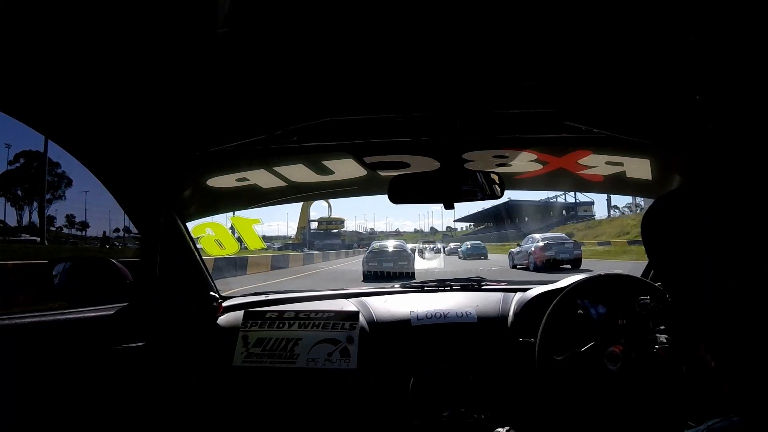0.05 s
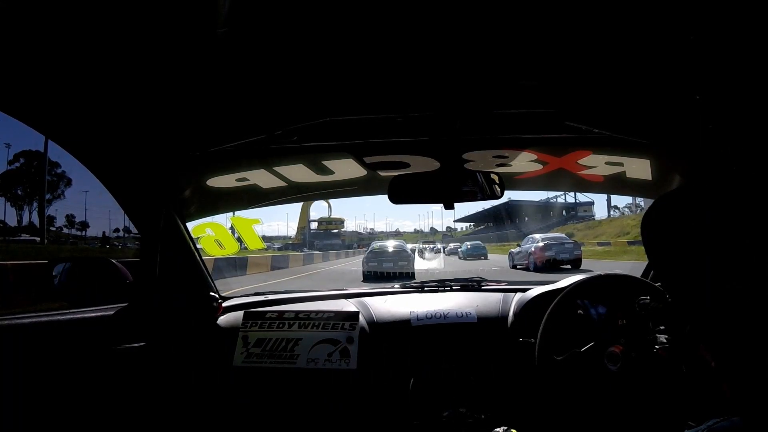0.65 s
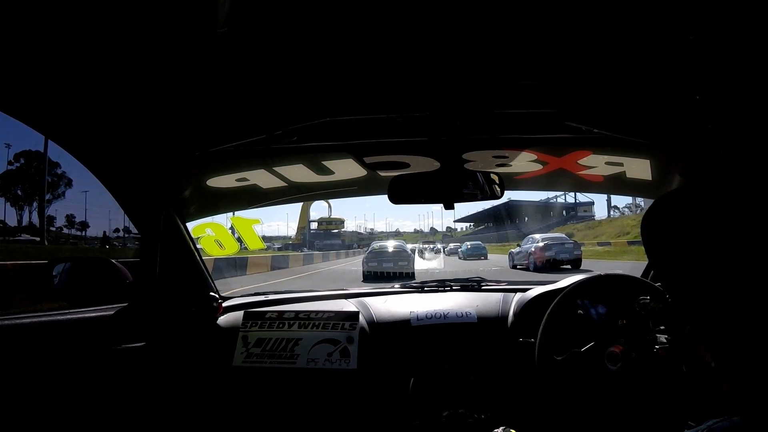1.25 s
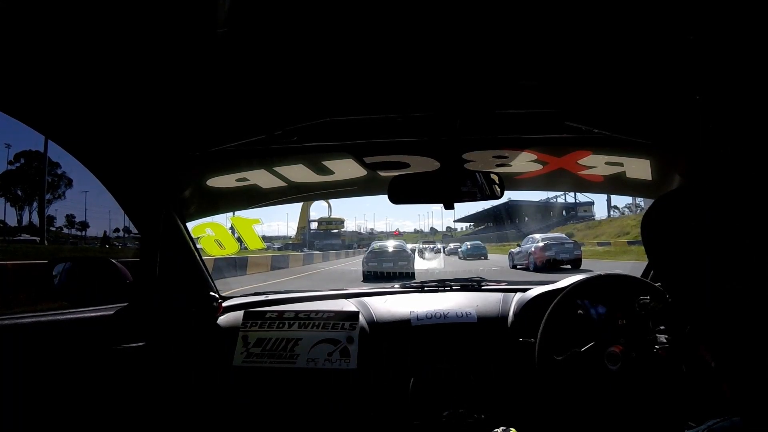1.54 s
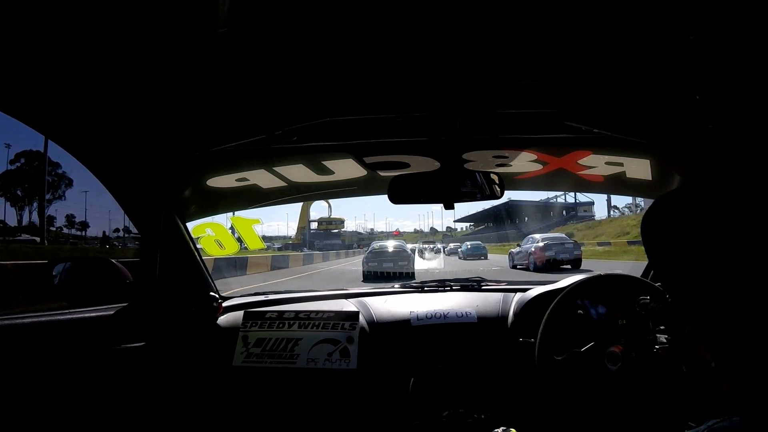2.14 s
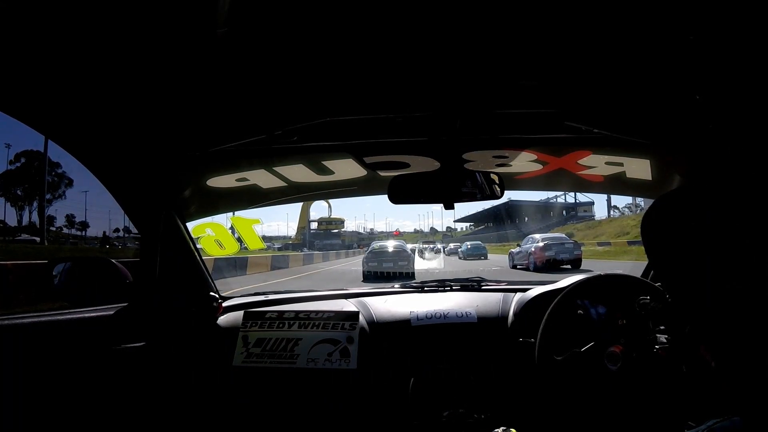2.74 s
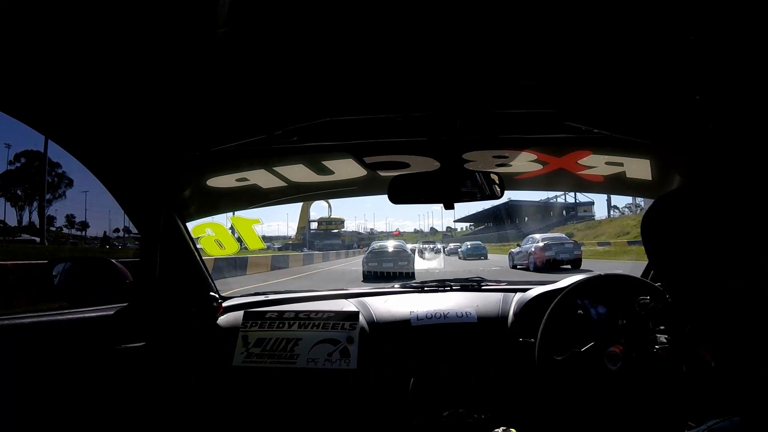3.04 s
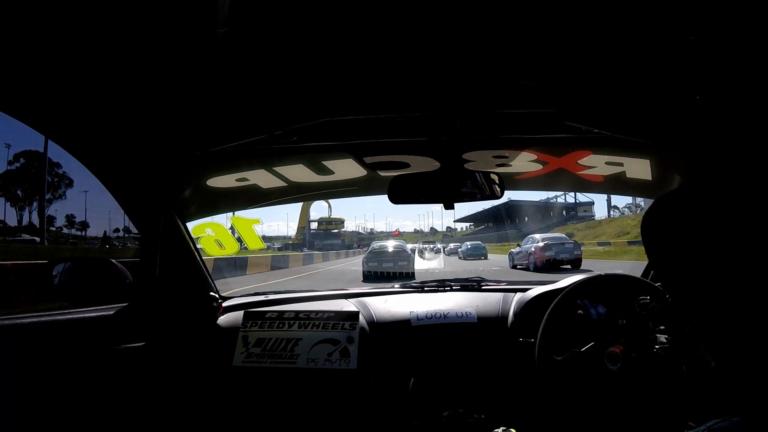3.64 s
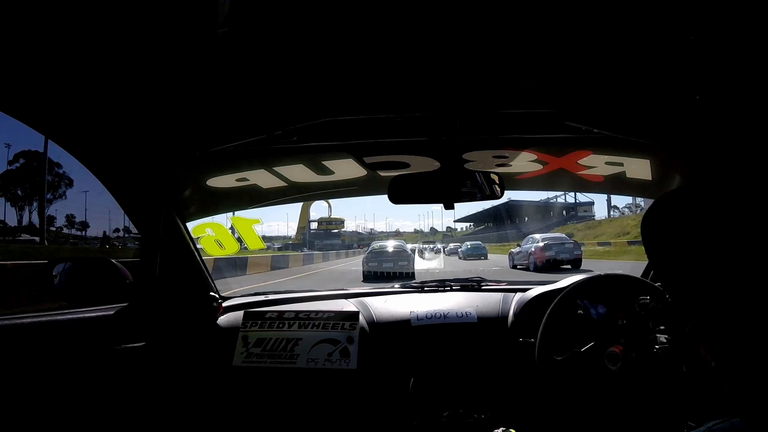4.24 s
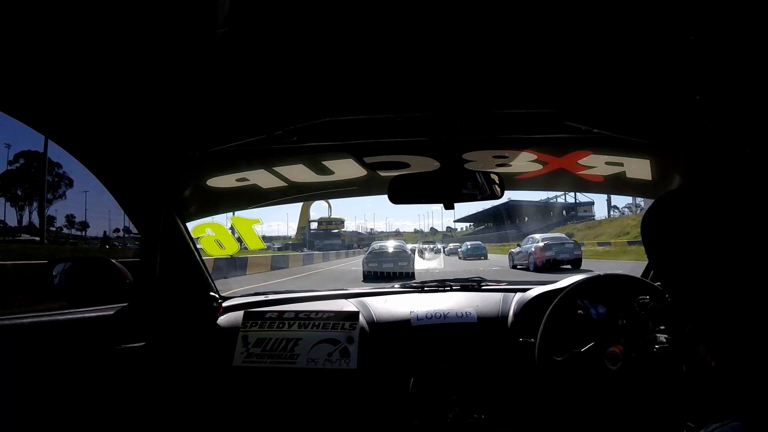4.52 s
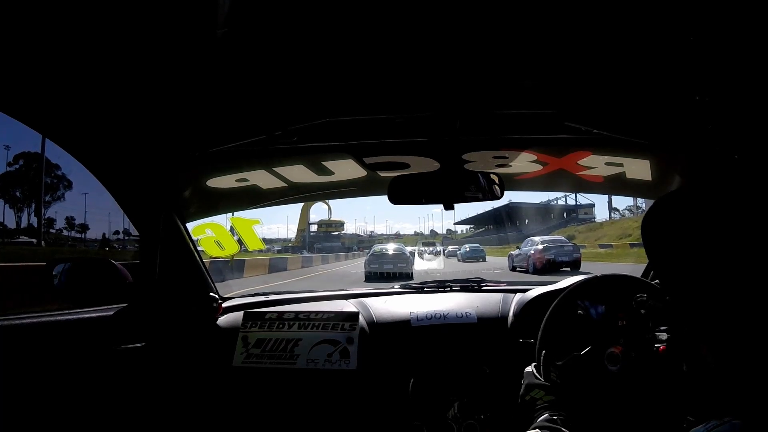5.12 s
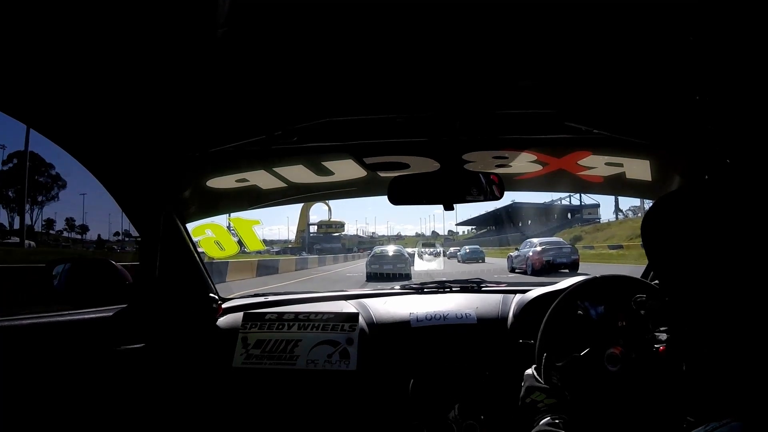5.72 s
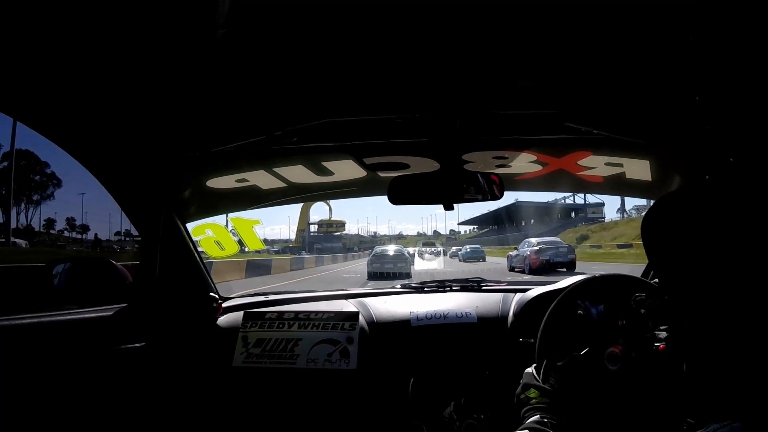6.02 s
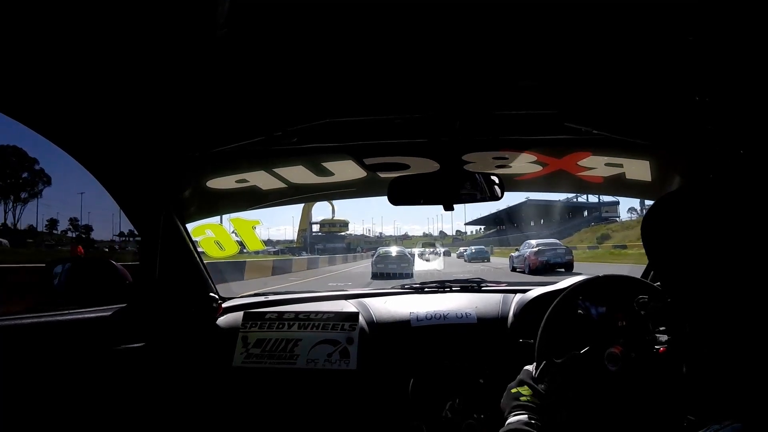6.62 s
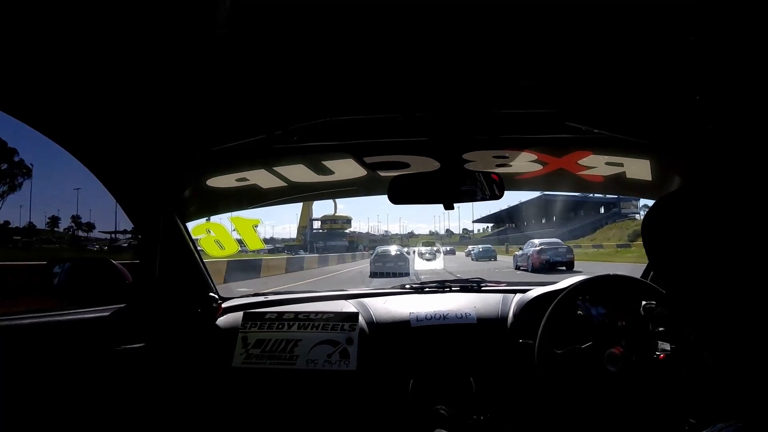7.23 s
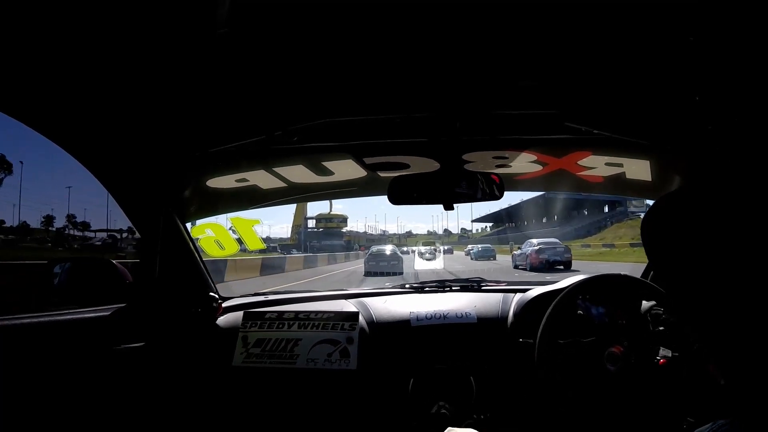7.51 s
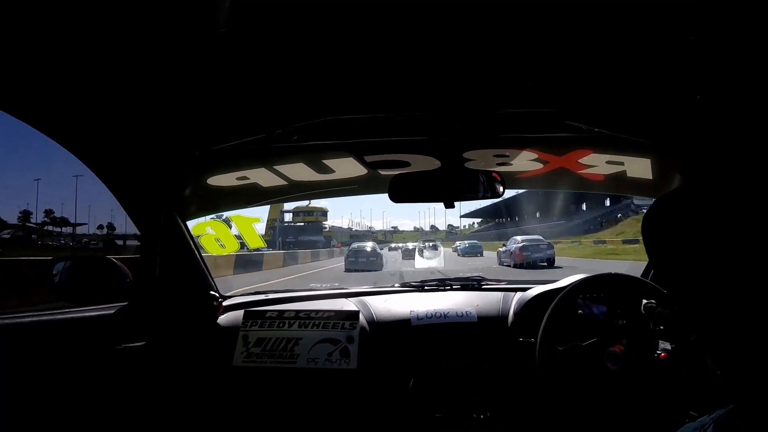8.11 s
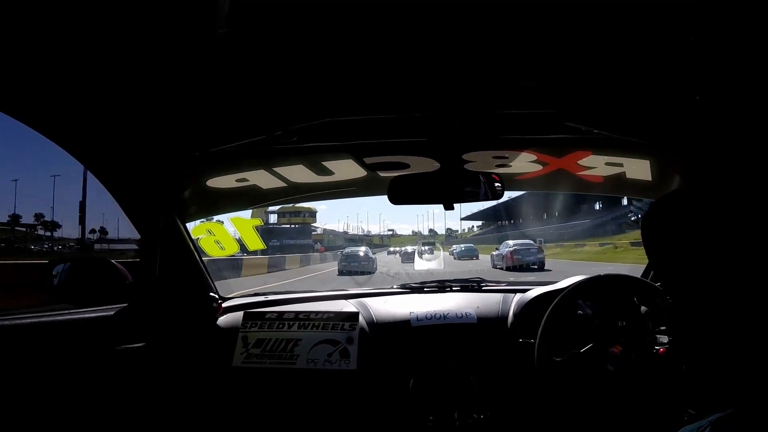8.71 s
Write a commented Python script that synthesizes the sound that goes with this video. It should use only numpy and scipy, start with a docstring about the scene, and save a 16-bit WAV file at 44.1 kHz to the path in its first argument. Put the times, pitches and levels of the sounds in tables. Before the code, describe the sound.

A race car's standing start heard from the cabin: throttle blips, held revs, then hard acceleration with chirping tyres and one upshift.

```python
"""A rotary race engine, heard from inside the car during a standing start, on the left channel.
The driver taps the throttle, launches, pulls through first gear and changes up. Each firing sends out
a pulse of gas; the pulses make a stack of tones that swell as the pipes and cabin ring along.
Spinning tyres stick and slip, grit rattles on the floor, loose trim buzzes and the shell rumbles.
Rival cars hold and raise their revs outside, heard through the bodywork."""
import sys
import numpy as np
from scipy import signal
from scipy.fft import rfft, irfft, next_fast_len
from scipy.io import wavfile
from scipy.ndimage import uniform_filter1d

SR = 44100
rng = np.random.default_rng(int(sys.argv[2]) if len(sys.argv) > 2 else 0)


def log_audio(samples):
    """Write samples as a 16-bit WAV file to the path given in sys.argv[1]."""
    # one column per channel
    frames = np.atleast_2d(samples).T
    # limit to full scale, then quantise
    limited = np.clip(frames, -1, 1)
    pcm = np.round(limited * 32767).astype(np.int16)
    wavfile.write(sys.argv[1], SR, pcm)


N = 395136
TIME = np.arange(N) / SR

# An "order" is a tone at a multiple of the firing rate. "Load" is how hard the engine works.
# The engine's low tones: (order, level [dB], roughness [0-1], slow swelling [dB], lowest load [dB])
LOW_ORDERS = [(1, -29.5, 0.14, 0.5, -19), (2, -40.5, 0.2, 1.53, -8.5), (3, -46.5, 0.07, 1, -11.5),
              (4, -49.5, .35, 2, -25)]
# In-between tones from unequal rotors: (order, level [dB])
ROTOR_ORDERS = [(.5, -2.5), (1.5, -10), (2.5, -7.5), (3.5, -10), (4.5, -17)]
# Speeds at which the pipes boost or weaken a tone: (order, firing rate [Hz], width [Hz], boost [dB])
PIPE_RESONANCES = [(.5, 186, 26, 4.5), (.5, 270, 16, 5.5), (1.5, 238, 14, 8), (1.5, 245, 6, 5),
                   (2.5, 236, 14, -9), (2.5, 290, 10, -7), (2.5, 275, 9, 6.5), (1, 114.3, 31, 12),
                   (1, 160, 12, 1.5), (1, 199, 11, 2.5), (1, 218.2, 22.2, 9), (1, 242.5, 3.5, -11),
                   (1, 249, 13, 11), (1, 269, 9.8, 5), (2, 53.6, 11.2, 12.5), (2, 112, 35, 12),
                   (2, 136, 8.3, -7), (2, 145, 11, 11.5), (2, 160, 11, -5), (2, 181, 16, -5),
                   (2, 197.3, 14, 11.5), (2, 201, 3.5, -9), (2, 208, 9.5, 4.5), (2, 216.5, 3.6, -7.5),
                   (2, 260, 4.6, -7.5), (2, 240, 8.8, 3.5), (2, 253, 9.1, 12), (2, 277, 8.3, 9),
                   (3, 96, 14, 8.5), (3, 177, 6, 2.5), (3, 183.5, 5, 3), (3, 185.5, 22.7, 18),
                   (3, 197.5, 5.5, -10.5), (3, 211, 8, 9), (3, 217.5, 2.8, -8.5), (3, 224, 4.3, 6),
                   (3, 235.7, 11, -13), (3, 241.3, 2, 5.5), (3, 243.5, 7.6, 14.5), (3, 270, 5.2, -2.5),
                   (3, 273, 18, 12), (3, 280, 3.7, -17), (4, 125, 51, 5), (4, 142.8, 16, 10),
                   (4, 181, 8.2, 3), (4, 198, 5.5, 8), (4, 207, 7, 7.5), (4, 234, 7, 7.5),
                   (4, 230, 30, -9.5), (4, 262, 24, 14.5), (4, 277, 8, 3.5), (5, 115, 11, 9),
                   (5, 230, 24, -5.5), (5, 248, 7, 6), (5, 266, 10, -7), (5, 278, 9, 9.5), (6, 187, 10, 5)]
# Uneven burning at idle, clutch bite, wheel hop and lift-off: (start [s], end [s], speed wobble [share])
RAGGED_SPELLS = [(-.1, 2.47, .004), (4.42, 4.95, .014), (5.951, 7.2, .003), (8.05, 8.62, .012)]
# Throttle taps while waiting: (peak time [s], peak firing rate [Hz], load [dB])
THROTTLE_TAPS = [(.08, 51.2, 2.5), (.5, 57.5, 0.5), (1.2, 50, -6), (1.8, 57, 1)]
# Engine speed through rev-up, launch and gear change: (time [s], firing rate [Hz])
ENGINE_REVS = [(2.92, 40.2), (2.98, 71), (3.08, 81), (3.22, 106), (3.32, 117), (3.47, 127.5), (3.71, 137.3),
               (3.94, 137.0), (4.08, 128.7), (4.6, 136.2), (4.7, 150.5), (4.86, 173), (5.02, 175.3),
               (5.2, 185), (5.34, 189.2), (5.44, 186), (5.59, 175), (5.72, 185), (5.9, 195.5), (6.0, 199),
               (6.2, 211), (6.5, 216.5), (6.8, 225), (6.92, 232.5), (7.2, 239.5), (7.5, 244.5),
               (7.6, 251.4), (7.8, 269.6), (8.0, 279.5), (8.14, 269), (8.35, 273), (8.46, 218.3),
               (8.6, 184), (8.69, 182), (8.81, 191.3), (8.96, 191)]
# Spells on the throttle: (start [s], end [s], first load [dB], last load [dB])
THROTTLE_PRESSES = [(3.036, 3.318, 4, -1.5), (3.4, 4.55, -13, -10.5), (3.593, 3.632, -2.5, -1),
                    (4.595, 5.21, 0.5, 5), (5.214, 5.542, 3.5, 1.5), (5.575, 5.86, -1.5, -1.5),
                    (5.9, 7.999, 1, -0.5), (8.515, 8.96, -2.5, -4)]

# Squeals of the spinning tyres: (start [s], end [s], first pitch [Hz], last pitch [Hz], level [dB])
SQUEALS = [(5.54, 5.62, 951, 974, -35), (5.55, 5.645, 1152, 1088, -37), (5.555, 5.63, 1196, 1210, -40),
           (5.63, 5.78, 943, 905, -37), (5.735, 5.81, 1195, 1185, -35), (5.82, 5.9, 966, 1006, -33.5),
           (5.83, 5.9, 1198, 1240, -36), (5.84, 5.885, 1375, 1380, -39), (5.915, 6.0, 1222, 1198, -36.5),
           (5.92, 5.99, 1010, 977.6, -35), (5.935, 5.995, 1310, 1350, -37), (6.0, 6.06, 1240, 1274, -42)]
# Tyres scrubbing the road, then the ring of clattering grit:
# (start [s], end [s], pitch [Hz], width [Hz], level [dB])
SCRUB_AND_CLATTER = [(4.42, 4.9, 465, 274, -35), (4.98, 5.28, 2520, 496, -51), (4.7, 5.35, 4744, 1500, -61),
                     (5.54, 6.1, 1075, 420, -37), (5.56, 5.72, 2050, 510, -43),
                     (5.8, 6.02, 1902, 600, -46.5), (6.1, 7.15, 1051, 300.2, -50.5)]
# Sprays of grit, about one per turn of the tyres: (time [s], length [s], level [dB])
GRIT_SPRAYS = [(4.465, .02, -41.5), (5.03, .015, -39), (5.935, .025, -45), (6.03, .07, -43),
               (6.125, .055, -37.5), (6.208, .048, -37.5), (6.305, .025, -42.5), (6.39, .045, -40),
               (6.487, .052, -37.5), (6.572, .012, -38.5), (6.592, .03, -39), (6.666, .035, -41),
               (6.765, .025, -43), (6.85, .04, -44.5), (6.941, .008, -39), (7.039, .01, -38),
               (7.056, .04, -42.5)]
# Tone colour of the grit: (frequency [Hz], level [dB])
GRIT_SPECTRUM = [(400, -9.5), (1100, 6.5), (1600, 3), (2500, 3.5), (4200, -7.5), (6500, -12), (7600, -28.5),
                 (9500, -43)]
# Spells when the engine shakes the trim hard: (start [s], end [s], level [dB])
TRIM_BUZZES = [(3.162, 3.247, -47), (4.95, 5.5, -47.5), (7.55, 8.04, -53), (7.864, 8.03, -49.5)]
# Tone colour of the buzzing trim: (frequency [Hz], level [dB])
BUZZ_SPECTRUM = [(900, -4.5), (1500, 1.5), (3000, -3), (4500, -17), (6000, -27), (7200, -48)]
# The shell booms as the drivetrain judders: (start [s], end [s], pitch [Hz], width [Hz], level [dB])
SHUDDERS = [(4.4, 4.9, 230, 140, -33), (4.7, 5.7, 80, 8.3, -42), (5.88, 6.2, 100.6, 13.6, -23.5),
            (6.15, 7.2, 84.7, 16.5, -27.5), (6.1, 7.15, 231, 59, -34), (8.38, 8.66, 182, 180, -26),
            (8.05, 8.42, 255, 104, -35.5)]

# Jolts that set the shell rumbling: (time [s], half-length [s], level [dB])
SHELL_JOLTS = [(0.115, 0.019, -17.5), (.28, .08, -23.5), (0.765, 0.24, -24.5), (1.749, 0.22, -23.5),
               (2.93, 0.042, -28.5), (5.0, .5, -37), (5.65, .09, -25.5), (5.923, .07, -25.5),
               (6.298, 0.11, -33.5), (6.734, 0.14, -25.5), (7.199, 0.14, -28.5), (7.62, 0.16, -35.5),
               (8.165, 0.085, -25), (8.511, 0.071, -21.5)]
# Tone colour of that rumble: (frequency [Hz], level [dB])
RUMBLE_SPECTRUM = [(15, -20), (25, -7.5), (33, -3), (44, -2.5), (55, -0.5), (70, -21.5), (100, -13)]
# Loudness of the background roar and hiss, which dips as the loud rev-up begins: (time [s], level [dB])
BACKGROUND_LEVEL = [(0.0, -51.5), (0.25, -53.5), (2.99, -48.5), (3.12, -54), (3.24, -53), (4.42, -49),
                    (4.47, -46), (4.67, -47.5), (5.01, -42), (5.54, -46), (5.59, -45.5), (5.97, -45),
                    (6.1, -46.5), (6.35, -48.5), (7.09, -48.5), (7.36, -51.5), (7.99, -45), (8.06, -49.5),
                    (8.78, -52), (8.96, -48)]
# Tone colour of the roar: (frequency [Hz], level [dB])
ROAR_SPECTRUM = [(60, 3.5), (100, 14), (150, 10), (220, 20), (300, 9), (420, 6.5), (580, 8.5), (800, 2),
                 (1150, -3.5), (1500, -4), (2200, -5), (3200, -11), (4500, -23.5), (7000, -49)]
# Tone colour of the hiss: (frequency [Hz], level [dB])
HISS_SPECTRUM = [(1500, -14), (2800, 5.5), (4000, 1), (4700, -1), (5800, -5.5), (6400, -4), (7000, -12),
                 (7600, -27), (8900, -35), (10000, -33.5)]
# Road noise, which comes up once the car rolls: (time [s], level [dB])
ROAD_LEVEL = [(0, -69.5), (4.25, -53.5), (4.6, -38.5), (6.6, -35.5), (7.6, -39.5), (8.1, -33.5),
              (8.35, -43.5), (8.5, -37), (8.96, -35)]
# Tone colour of the road: (frequency [Hz], level [dB])
ROAD_SPECTRUM = [(200, 5.5), (300, -6), (430, 4.5), (650, -5), (1100, -8), (1600, -19)]
# Pitches at which the cabin and its panels ring: (pitch [Hz], width [Hz], boost [dB])
CABIN_RESONANCES = [(91.2, 25, 7.5), (362.8, 35, 5.5), (565, 76, 7), (655, 51, 4.5), (790, 18, 8.5),
                    (1112, 97, 6), (1260, 130, 2.5), (1930, 820, 1.5), (2800, 670, -1)]
# Pitches at which the cabin booms when shaken from outside: (pitch [Hz], width [Hz], boost [dB])
CABIN_BOOMS = [(125, 18, 6.5), (184.6, 18.7, 6.5), (224, 16.5, 10.5)]

# The nearest car holds its revs, then sags and recovers as it launches: (time [s], firing rate [Hz])
NEIGHBOUR_REVS = [(0, 179), (1, 184.5), (1.7, 191), (2.4, 198), (3, 202), (4.3, 207), (4.5, 224),
                  (4.68, 222), (4.79, 205), (4.92, 227), (5.08, 212), (5.18, 218), (5.35, 232), (5.6, 222)]
# Its strength: (time [s], firing tone [dB], overtones [dB], peak order, rasp [dB])
NEIGHBOUR_LEVELS = [(0, -39, -47.5, 2.3, -60.5), (.35, -39.5, -49.5, 2.3, -58.5),
                    (.7, -40, -47.5, 2.3, -65), (1, -32.5, -43, 2.3, -56), (1.3, -32.5, -48.5, 2.2, -66),
                    (1.7, -31, -51, 2.2, -65.5), (2.1, -34, -40.5, 2.2, -57),
                    (2.45, -33, -42.5, 2.1, -51.5), (2.7, -32, -43, 2.1, -57), (2.95, -32.5, -45, 2.1, -52),
                    (3.3, -34.5, -50, 2.1, -62.5), (4.2, -35, -56, 2.2, -68), (4.6, -37, -50, 3, -62),
                    (4.8, -27.5, -38, 3, -56), (4.92, -34, -37, 3, -55), (5.15, -33.5, -39.5, 3, -56),
                    (5.33, -32.5, -50, 3, -58), (5.6, -41, -56, 3, -67)]
# The higher tones that make its rasp: (order, level [dB])
NEIGHBOUR_RASP = [(4, -8), (5, -9), (6, -1), (7, -10), (11, -9)]
# Other cars revving: (start [s], end [s], first firing rate [Hz], last firing rate [Hz],
# firing tone [dB], overtones [dB], peak order)
RIVAL_REVS = [(0.16, 0.453, 132, 140, -34, -40.5, 2), (0.982, 1.298, 188, 219, -39, -47, 3),
              (1.238, 1.799, 108, 156, -31.5, -49, 4), (1.759, 2.068, 157, 205, -30.5, -46.5, 2.6),
              (2.201, 2.468, 200, 223, -27.5, -47, 3), (2.05, 2.695, 125, 143, -39, -48, 2.6),
              (2.05, 2.33, 173, 143, -43, -42, 2), (2.201, 2.542, 130, 157, -48, -45.5, 3),
              (2.48, 2.86, 226, 262, -37, -56, 2), (2.64, 2.94, 179, 195, -41, -43.5, 2),
              (2.7, 3.17, 124, 163, -35.5, -44, 4), (3.301, 3.578, 120, 135, -52, -49, 4),
              (3.34, 3.58, 197, 218, -42, -46.5, 3), (3.5, 4.402, 124, 134, -41.5, -45.5, 3),
              (4.37, 4.602, 214, 228, -37.5, -50, 3), (4.5, 4.72, 250, 230, -36, -50, 2)]
# Faint whines and rasps from the grid: (start [s], end [s], pitch [Hz], width [Hz], level [dB])
GRID_WHINES = [(-.1, .76, 2205, 60, -50), (-.1, .72, 2115, 90, -54), (.92, 1.38, 2200, 120, -55),
               (-.1, 1.4, 2900, 400, -59), (.15, .5, 1050, 70, -52), (-.1, 1.3, 810, 60, -54),
               (1.86, 2.3, 1100, 60, -51), (2.78, 3.1, 1255, 60, -48), (2.3, 2.8, 2110, 110, -56),
               (2.72, 3.02, 2110, 90, -51), (2.5, 3.04, 1400, 180, -54), (2.68, 3.06, 2500, 1800, -52),
               (1.9, 3.0, 6350, 350, -72), (3.7, 4.7, 6350, 400, -68)]


def own_engine(firing_hz, phase, load_db):
    """Exhaust pulses make clear low tones and rough high ones; unequal rotors add tones in between."""
    def ringing(order):
        """Gain that the cabin and pipes give this order as the speed changes."""
        pipes = [row[1:] for row in PIPE_RESONANCES if row[0] == order]
        return resonance_gain(order * firing_hz) * resonance_gain(firing_hz, pipes)
    low = np.zeros(N)
    for order, db, rough, swell_db, lowest_load_db in LOW_ORDERS:
        level_db = db + np.maximum(load_db, lowest_load_db) + swell_db * drift(5.9)
        low += from_db(level_db) * ringing(order) * engine_tone(phase, order, rough)
    ragged = phase + .1 * drift(64)   # each pulse comes a little early or late
    high = sum(from_db(-51 - 19 * np.log2(order / 5))   # 19 dB weaker per octave
               * ringing(order) * engine_tone(ragged, order, rough=.65) for order in range(5, 11))
    between = sum(from_db(db) * ringing(order) * engine_tone(phase, order, rough=.29)
                  for order, db in ROTOR_ORDERS)
    between_db = -41 + 3.5 * np.log2(firing_hz / 200)   # louder at high revs
    return low + from_db(load_db) * (high + from_db(between_db) * between)


def driver():
    """The throttle sets firing rate and load: short taps from idle, then longer presses."""
    idle_hz, rise_hz_per_s, fall_hz_per_s = 36., 55, 35
    idle_db, coast_db = -8., -22.5
    open_s, shut_s = .15, .12
    waiting_hz, waiting_db = np.full(N, idle_hz), np.full(N, idle_db)
    for peak_s, peak_hz, db in THROTTLE_TAPS:
        tap_hz = peak_hz - np.maximum(rise_hz_per_s * (peak_s - TIME), fall_hz_per_s * (TIME - peak_s))
        waiting_hz = np.maximum(waiting_hz, tap_hz)
        waiting_db = np.maximum(waiting_db, np.interp(tap_hz, [idle_hz, peak_hz], [idle_db, db]))
    presses = []
    for start, end, first_db, last_db in THROTTLE_PRESSES:
        corners = [start - open_s, start, end, end + shut_s]
        presses.append(np.interp(TIME, corners, [coast_db, first_db, last_db, coast_db]))
    idling = fade(-1, THROTTLE_PRESSES[0][0], edge_s=open_s)
    # The drivetrain winds up and unwinds, so the load surges 5.4 times a second.
    surge_db = 2 * fade(6, 7.2, edge_s=.1) * np.sin(2 * np.pi * 5.4 * (6 - TIME))
    load_db = idling * waiting_db + (1 - idling) * np.max(presses, axis=0) + surge_db
    firing_hz = np.where(TIME < ENGINE_REVS[0][0], waiting_hz, curves(ENGINE_REVS)[0])
    return firing_hz, load_db


def tyre_squeal():
    """The tread sticks and slips: each squeal is a wavering, rough tone with a faint octave."""
    out = np.zeros(N)
    wavers = [1 + .028 * drift(59.3) for _ in range(3)]
    grips = [unit_power(from_db(2.5 * drift(70))) for _ in range(3)]
    for k, (start, end, first_hz, last_hz, db) in enumerate(SQUEALS):
        hz = np.interp(TIME, [start, end], [first_hz, last_hz]) * wavers[k % 3]
        angle = 2 * np.pi * np.cumsum(hz) / SR
        tone = unit_power(np.sin(angle) + from_db(-12) * np.sin(2 * angle))
        out += from_db(db) * fade(start, end, edge_s=.022) * grips[k % 3] * tone
    return out


def grit():
    """Each spray is the tick of a first stone, then a rush of tiny hits on the damped floor."""
    sprays = np.zeros(N)
    for start, length, db in GRIT_SPRAYS:
        corners = [start - .002, start, start + .005, start + length, start + length + .008]
        sprays += from_db(db) * np.interp(TIME, corners, [0, 1, .9, .55, 0])
    crackle = unit_power(cabin_noise(GRIT_SPECTRUM) * from_db(1.2 * drift(250)))
    return sprays * crackle


def trim_buzz(phase):
    """Loose trim chatters: its noise bunches up round each firing."""
    shaking = sum(from_db(db) * fade(start, end, edge_s=.027) for start, end, db in TRIM_BUZZES)
    chatter = np.exp(.7 * np.cos(phase))
    return shaking * unit_power(chatter * cabin_noise(BUZZ_SPECTRUM))


def shell_rumble():
    """The car's shell rumbles softly all the time and swells with each jolt."""
    jolt_power = sum(from_db(db) ** 2 * np.exp(-((TIME - peak_s) / half_length) ** 2)
                     for peak_s, half_length, db in SHELL_JOLTS)
    shaking = np.sqrt(from_db(-39.5) ** 2 + jolt_power)
    return shaking * even_out(cabin_noise(RUMBLE_SPECTRUM), window_s=.067)


def roar_and_hiss(phase):
    """A background roar and hiss, with a slight puff of gas at every firing."""
    swell_db = curves(BACKGROUND_LEVEL)[0] + 50   # above or below the usual level
    roar = from_db(-35.5 + .99 * swell_db) * cabin_noise(ROAR_SPECTRUM)
    hiss = from_db(-55.5 + swell_db) * cabin_noise(HISS_SPECTRUM)
    puffs = unit_power(1 + .032 * np.cos(phase) + .016 * np.cos(phase / 2))
    return (roar + hiss) * puffs


def road_noise():
    """The road roars under the rolling car."""
    return from_db(curves(ROAD_LEVEL)[0]) * cabin_noise(ROAD_SPECTRUM)


def neighbour():
    """The nearest car, close enough to rasp, holds its revs, launches and is left behind."""
    firing_hz, = curves(NEIGHBOUR_REVS)
    tone_db, overtone_db, peak_order, rasp_db = curves(NEIGHBOUR_LEVELS)
    wobble = .002 + .008 * fade(4.35, 6.1, edge_s=.1)   # the revs flutter as its clutch bites
    phase = firing_phase(firing_hz, wobble)
    ragged = phase + .17 * drift(25)   # pulses come early or late
    rasp = sum(from_db(db) * resonance_gain(order * firing_hz) * engine_tone(ragged, order, rough=.6)
               for order, db in NEIGHBOUR_RASP)
    engine = rival_engine(firing_hz, phase, tone_db, overtone_db, peak_order)
    return (engine + from_db(rasp_db) * rasp) * fade(-.1, 6.7, edge_s=.083)


def rivals():
    """The other cars rev in short, even glides, most of them upward."""
    out = np.zeros(N)
    for start, end, first_hz, last_hz, tone_db, overtone_db, peak_order in RIVAL_REVS:
        firing_hz = np.interp(TIME, [start, end], [first_hz, last_hz])
        phase = firing_phase(firing_hz, wobble=.0055)
        engine = rival_engine(firing_hz, phase, tone_db, overtone_db, peak_order)
        out += engine * fade(start, end, edge_s=.088)
    return out


def rival_engine(firing_hz, phase, tone_db, overtone_db, peak_order):
    """Another engine through the bodywork: a booming firing tone and three rougher overtones."""
    overtones = np.zeros(N)
    for order in (2, 3, 4):
        gain = from_db(-26 * abs(np.log2(order / peak_order)))   # 26 dB less per octave off the peak
        overtones += gain * resonance_gain(order * firing_hz) * engine_tone(phase, order, rough=.42)
    tone = resonance_gain(firing_hz, CABIN_BOOMS) * engine_tone(phase, 1, rough=.18)
    return from_db(tone_db) * tone + from_db(overtone_db) * overtones


def ringing_bands(rows, edge_s):
    """Narrow bands of ringing noise, with the treble above 6000 Hz cut."""
    out = np.zeros(N)
    for start, end, hz, width, db in rows:
        band = signal.butter(2, [max(hz - width / 2, 15), hz + width / 2], "band", fs=SR, output="sos")
        ringing = even_out(signal.sosfilt(band, rng.standard_normal(N)), window_s=.012)
        out += from_db(db) * fade(start, end, edge_s) * ringing
    return signal.sosfilt(signal.butter(6, 6000, fs=SR, output="sos"), out)


def firing_phase(firing_hz, wobble):
    """Angle that makes one turn per firing; the shaft speed is never quite even."""
    return 2 * np.pi * np.cumsum(firing_hz * (1 + wobble * drift(25.4))) / SR


def engine_tone(phase, order, rough):
    """One order, whose strength and timing vary as the fuel burns unevenly."""
    angle = order * phase + rng.uniform(0, 2 * np.pi)
    return unit_power((1 + rough * drift(18)) * np.cos(angle) + rough * drift(18) * np.sin(angle))


def cabin_noise(spectrum):
    """Noise of a given tone colour, heard through the cabin; power 1."""
    hz, db = np.transpose(spectrum)
    size = next_fast_len(N)
    bin_hz = np.maximum(np.arange(size // 2 + 1) * SR / size, 1)
    colour = from_db(np.interp(np.log(bin_hz), np.log(hz), db))
    steep_ends = np.minimum(1, np.minimum(bin_hz / hz[0], hz[-1] / bin_hz)) ** 3
    cabin = from_db(boost_db(CABIN_RESONANCES, bin_hz) / 2)
    white = rfft(rng.standard_normal(size))
    return unit_power(irfft(white * colour * steep_ends * cabin, size)[:N])


def resonance_gain(hz, resonances=CABIN_RESONANCES):
    """A tone swells or dips as it glides through each resonance."""
    return np.interp(TIME, TIME[::100], from_db(boost_db(resonances, hz[::100])))


def boost_db(resonances, hz):
    """Decibels that a set of resonances adds at this pitch."""
    peaks = (db / (1 + (2 * (hz - centre) / width) ** 2) for centre, width, db in resonances)
    return sum(peaks, np.zeros_like(hz))


def even_out(x, window_s):
    """Smooths the deepest dips and swells out of a noise; power 1."""
    power = uniform_filter1d(x * x, max(int(window_s * SR), 8))
    return unit_power(x / np.sqrt(np.maximum(power, 0) + np.mean(x * x) / 10))


def drift(rate_hz):
    """A smooth random wander, about 1 in size, that changes about rate_hz times a second."""
    step, warm_up = 40, 2000
    pole = np.exp(-2 * np.pi * rate_hz * step / SR)
    white = rng.standard_normal(N // step + warm_up + 2)
    slow = signal.lfilter([1], [1, -2 * pole, pole * pole], white)[warm_up:]
    return np.interp(np.arange(N) / step, np.arange(len(slow)), unit_power(slow))


def fade(start, end, edge_s):
    """Fades in from start and out by end, each over edge_s seconds."""
    return np.clip(np.minimum(TIME - start, end - TIME) / edge_s, 0, 1)


def curves(rows):
    """Joins a table's timed points with straight lines, one curve per value column."""
    times, *columns = np.transpose(rows)
    return [np.interp(TIME, times, column) for column in columns]


def unit_power(x):
    """Scales a signal to an average power of 1."""
    return x / np.sqrt(np.mean(x ** 2) + 1e-20)


def from_db(db):
    """Turns decibels into gain."""
    return 10 ** (np.asarray(db) / 20)


def scene():
    """Everything meets at one microphone on the left; the right channel is all but silent."""
    firing_hz, load_db = driver()
    wobble = .0016 + sum(share * fade(start, end, edge_s=.16) for start, end, share in RAGGED_SPELLS)
    phase = firing_phase(firing_hz, wobble)
    engine = own_engine(firing_hz, phase, load_db)
    din = shell_rumble() + roar_and_hiss(phase) + road_noise()
    rattles = trim_buzz(phase) + grit()
    launch = tyre_squeal() + ringing_bands(SCRUB_AND_CLATTER, edge_s=.013)
    shudder = ringing_bands(SHUDDERS, edge_s=.057)
    grid = neighbour() + rivals() + ringing_bands(GRID_WHINES, edge_s=.08)
    return (engine + din + rattles + launch + shudder + grid) * from_db([[0], [-76]])


def record(dry):
    """Turns the sound up, rounds off its loudest peaks and cuts the treble above 9500 Hz."""
    loud = dry * from_db(7)
    rounded = loud / (1 + (loud / .97) ** 8) ** (1 / 8)
    eased = rounded * fade(0, N / SR, edge_s=.004)
    return signal.sosfilt(signal.cheby1(10, .2, 9500, fs=SR, output="sos"), eased)


dry = scene()
out = record(dry)
log_audio(out)
```